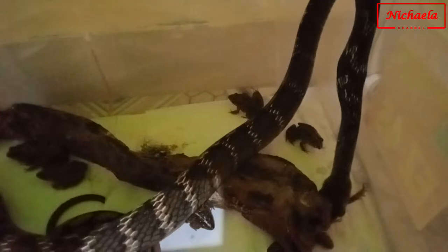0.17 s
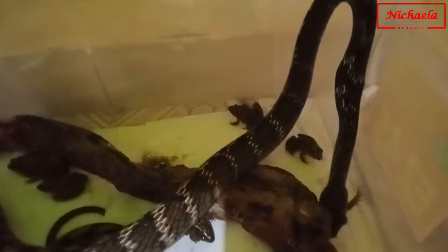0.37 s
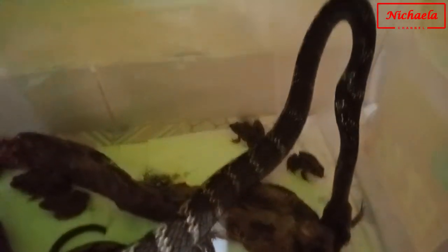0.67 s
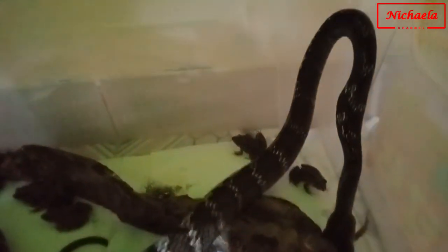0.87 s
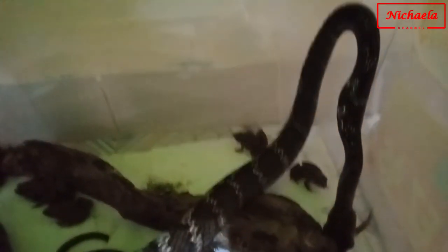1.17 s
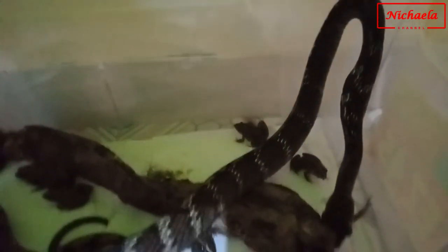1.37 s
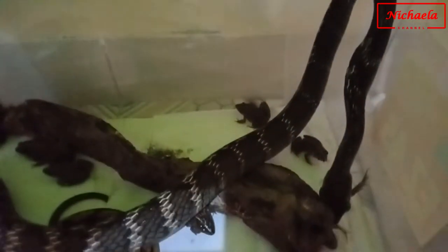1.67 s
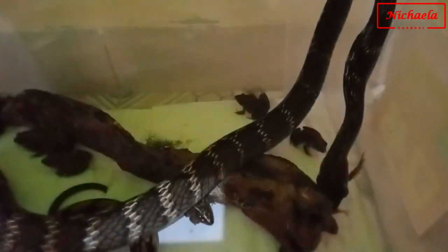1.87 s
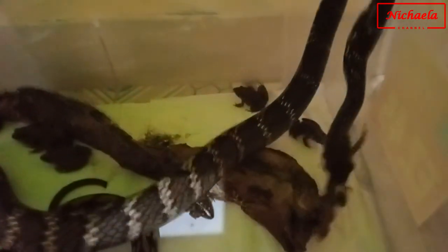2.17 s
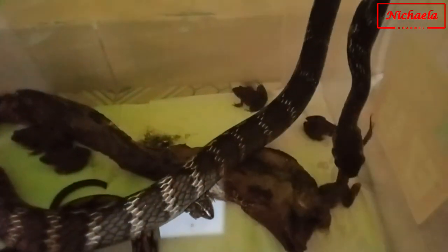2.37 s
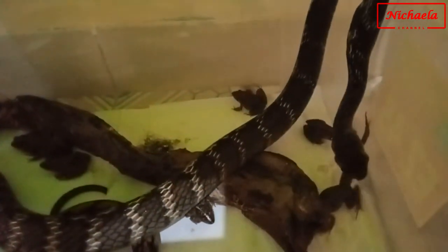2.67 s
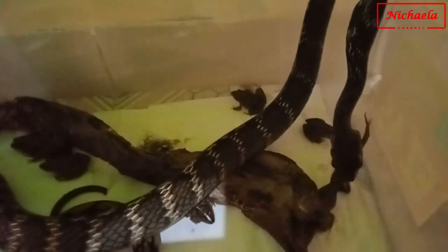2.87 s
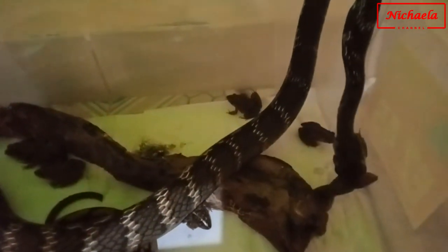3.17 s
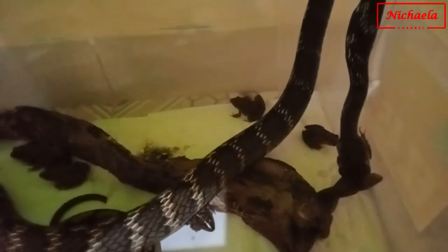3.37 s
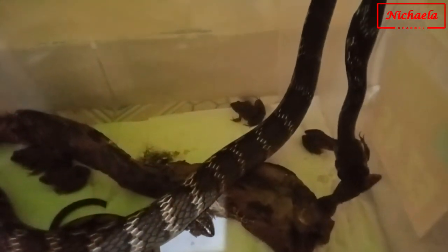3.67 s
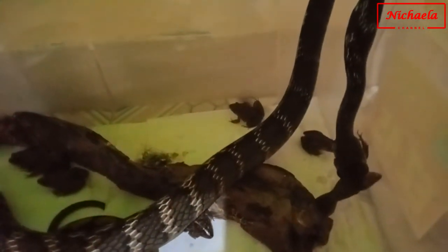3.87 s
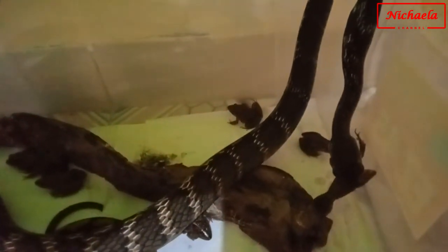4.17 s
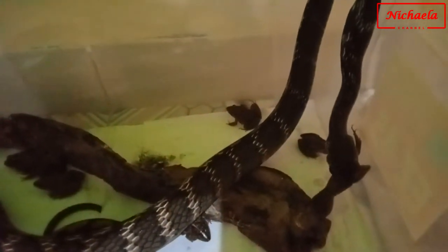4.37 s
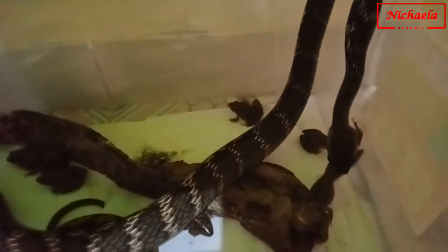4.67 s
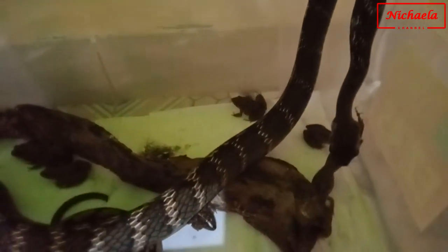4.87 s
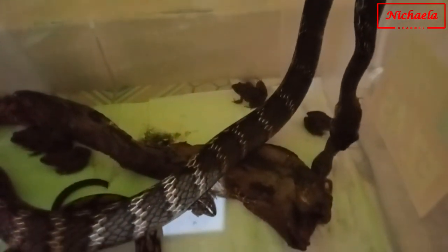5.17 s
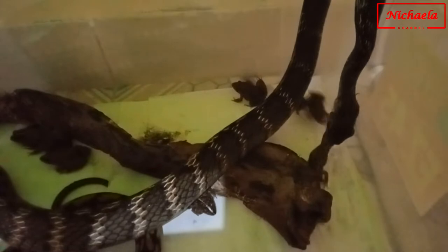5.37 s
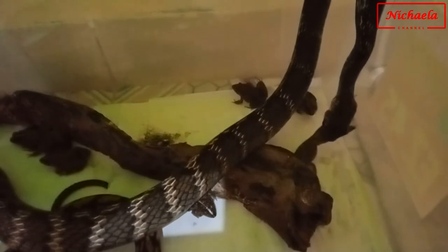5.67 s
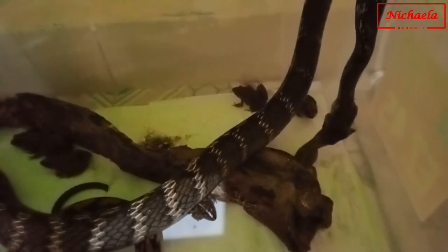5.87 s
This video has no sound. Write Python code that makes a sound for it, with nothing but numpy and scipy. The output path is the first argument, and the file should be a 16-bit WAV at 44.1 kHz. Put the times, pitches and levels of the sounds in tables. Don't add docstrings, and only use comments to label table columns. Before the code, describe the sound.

A frog gives five short, harsh, high screams inside a hard-walled box, with thin squeals, a croak, body knocks and skin rustling between them.

```python
import sys
import numpy as np
from scipy import signal
from scipy.fft import rfft, irfft, next_fast_len
from scipy.io import wavfile
from scipy.ndimage import uniform_filter1d

SR = 44100
rng = np.random.default_rng(int(sys.argv[2]) if len(sys.argv) > 2 else 0)


def output_pcm(signal):
    pcm = np.clip(np.atleast_2d(signal).T, -1, 1) * 32767
    wavfile.write(sys.argv[1], SR, np.round(pcm).astype(np.int16))


def boost(x):
    u = np.asarray(x, float) / 20
    return 10 ** u


N = 264952
MOVED_S = 2.0


def unit(x):
    return x / np.sqrt(np.sum(x ** 2) + 1e-20)


def gated(rows, level_db, fade_s=0.0028):
    s, out = np.array(rows)[:, 0], np.zeros(N)
    at = np.arange(round((s[0] - fade_s) * SR), min(round(s[-1] * SR), N))
    fade_in = (at / SR - s[0]) / fade_s + 1
    fade_out = (s[-1] - at / SR) / fade_s
    edge = np.clip(np.minimum(fade_in, fade_out), 0, 1)
    out[at] = edge * boost(np.interp(at / SR, s, level_db))
    return out


def level(rows):
    return gated(rows, np.array(rows)[:, -1])


def coloured(x, spectrum):
    size, points = next_fast_len(len(x)), np.array(spectrum)
    hz = np.maximum(np.fft.rfftfreq(size, 1 / SR), 1)
    gain_db = np.interp(np.log(hz), np.log(points[:, 0]), points[:, 1], left=-90, right=-90)
    gain = boost(gain_db)
    return irfft(rfft(x, size) * gain / np.sqrt(np.mean(gain ** 2)), size)[:len(x)]


def drift(rate_hz):
    lowpass = signal.butter(2, rate_hz, fs=SR, output="sos")
    slow = signal.sosfilt(lowpass, rng.standard_normal(N + SR))[SR:]
    return slow / slow.std()


def band(x, low_hz, high_hz, order=2):
    return signal.sosfilt(signal.butter(order, [low_hz, high_hz], "band", fs=SR, output="sos"), x)


def ring(x, hz, width_hz):
    r, state, out = np.exp(-np.pi * width_hz / SR), np.zeros(2), []
    zeros = [(1 - r * r) / 2, 0, (r * r - 1) / 2]
    for part, now_hz in zip(np.array_split(x, len(hz)), hz):
        poles = [1, -2 * r * np.cos(2 * np.pi * now_hz / SR), r * r]
        rung, state = signal.lfilter(zeros, poles, part, zi=state)
        out.append(rung)
    return np.concatenate(out)


def resonate(x, modes, stretch):
    return sum((-1) ** k * boost(db) * ring(x, hz * stretch, width_hz)
               for k, (hz, width_hz, db) in enumerate(modes))


# (middle [s], length [s], peak [dB])
SWELLS = [(0.405, 0.72, -48), (1.15, 0.41, -56), (1.439, 0.23, -59.5), (1.783, .55, -57.5),
          (2.189, 0.13404, -36), (2.371, 0.44, -47), (3.024, 0.14, -58.5), (3.25, 0.14, -63),
          (3.46, 0.1566, -63), (4.411, 0.32, -65.5), (4.754, 0.37, -67.5), (5.561, 0.27, -76)]
# (frequency [Hz], density [dB per Hz])
RUMBLE_SPECTRUM = [(20, -20.5), (37, -16.5), (56, -7), (97, 3), (151, -2.5), (262, -25), (422, -21.5),
                   (700, -35)]
HISS_SPECTRUM = [(300, -32.5), (500, -8), (1100, -12.5), (2400, -10), (3500, -10), (6000, -17.5),
                 (10000, -26.5), (16000, -35.5)]
HISS_DB, RUMBLE_BED_DB = -71.5, -74.5
SCREAM_RUMBLE_DB = -48.5


def background():
    (effort, opening), t = effort_and_jaw(), np.arange(N) / SR
    gain = boost(RUMBLE_BED_DB) + effort * boost(SCREAM_RUMBLE_DB + jaw(opening, column=3))
    for s, length_s, db in SWELLS:
        gain = gain + boost(db) * np.cos(np.pi * np.clip((t - s) / length_s, -.5, .5)) ** 2
    rumble = coloured(rng.standard_normal(N), RUMBLE_SPECTRUM) * gain * boost(2.1 * drift(7.6))
    hiss = boost(HISS_DB + 2.5 * drift(6)) * coloured(rng.standard_normal(N), HISS_SPECTRUM)
    return rumble + hiss


# (start [s], length [s], level [dB])
DRAGS = [
    (0.194, 0.34, -55),
    (2.11, .49, -60),
    (4.797, .25, -58.5),
]
# (time [s], peak [dB], t60 [s])
SLIPS = [
    (.22, -53, 0.043),
    (0.409, -39.5, 0.059),
    (2.11, -47, .5),
    (2.153, -27, 0.034),
    (2.328, -54, 0.78),
    (2.501, -50, 0.34),
    (4.862, -42, 0.04604),
    (5.088, -49, .4),
]
# (frequency [Hz], density [dB per Hz])
RUSTLE_SPECTRUM = [(200, -42), (420, -16), (800, -24), (1400, -2.5), (3300, -9), (5500, -26.5),
                   (9000, -42.5), (15000, -53.5)]
SLIP_RISE_S = .006


def rustle():
    slips = (rng.random(N) < 4000 / SR) * rng.standard_normal(N) * boost(3 * drift(35))
    heard = box(coloured(slips, RUSTLE_SPECTRUM), modes_db=-2.0)
    gain = sum(gated([(s, db), (s + length_s, db)], [db, db], fade_s=0.025) for s, length_s, db in DRAGS)
    for s, db, t60_s in SLIPS:
        gain = gain + level([(s - SLIP_RISE_S, db - 18.5), (s, db), (s + t60_s / 2, db - 27.5)])
    return heard / heard.std() * gain


# (time [s], peak [dB], thud around 190-1100 Hz re peak [dB], hiss above 3.6 kHz re
# peak [dB])
KNOCKS = [(0.408, -37.5, -39.5, -36.5), (1.166, -43.5, -7, -31), (1.194, -32.5, -36, -18.5),
          (1.644, -41, -34, -10), (2.108, -34, -29, -32.5), (2.135, -10.5, -23.5, -31),
          (2.155, -5.5, -9.5, -47.5), (2.214, -32, -2.5, -35), (2.331, -19.5, -10.5, -32),
          (2.363, -14, -21.5, -26), (2.413, -29.5, -14, -31), (2.499, -29, -16.5, -6.5),
          (2.956, -23.5, -21.5, -28), (3.078, -37, -43, -9), (4.4, -30.5, -35.5, -38.5),
          (5.076, -52.5, -45, -2), (5.528, -35.5, -42, -7)]
# (frequency [Hz], density [dB per Hz])
SLAP_SPECTRUM = [(300, -27.5), (600, -12), (1000, -13.5), (1800, -1), (2700, -7), (3900, -13), (5500, -31),
                 (7000, -44)]
KNOCK_T60_S, KNOCK_RISE_S = .06, 0.00017


def knocks():
    slap = coloured(rng.standard_normal(N), SLAP_SPECTRUM)
    thud = band(rng.standard_normal(N), 190, 1100) * boost(23.5)
    hiss = band(rng.standard_normal(N), 3600, 6600) * boost(9.5)
    hiss = hiss + band(rng.standard_normal(N), 9500, 15500) * boost(-11.5)
    out = np.zeros(N)
    for s, db, thud_db, hiss_db in KNOCKS:
        span = slice(round(s * SR), round(s * SR) + SR // 3)
        age_s = np.arange(len(out[span])) / SR
        dying = (slap[span] + hiss[span] * boost(hiss_db)) * boost(-60 * age_s / KNOCK_T60_S)
        booming = thud[span] * boost(thud_db - 60 * age_s / (2.3 * KNOCK_T60_S))
        out[span] += boost(db - 11.5) * (1 - np.exp(-age_s / KNOCK_RISE_S)) * (dying + booming)
    return out


# (start [s], held [s], effort [dB], mouth opening [0-1], swell of effort while held [dB])
CALLS = [
    (.541, 0.015, -22, 0.2, 14.5),
    (.582, .053, -10, 0.3, 5.5),
    (.65, 0.28, -5, 1.04, -5),
    (2.678, 0.23, -6, .86, -0.2),
    (3.58, 0.074, -6.5, 0.5, -1.5),
    (3.889, .024, -10, .12, -5),
    (4.003, 0.14, -1.5, .62, -4),
    (5.213, .158, -4, .92, -2.3),
]
JAW_SAG_PER_S = 1.02
RELEASE_S, CLOSING_S = .009, 0.013


def call_times():
    s, held_s, _, wide, _ = np.transpose(CALLS)
    tired = np.maximum(wide - JAW_SAG_PER_S * held_s, 0)
    return np.transpose([s, s + held_s, s + held_s + RELEASE_S + CLOSING_S * tired, tired])


# (time [s], effort [dB], mouth opening [0-1])
SNAPS = [
    (1.1192, -29.5, 0.01),
    (1.1522, -32.5, 0.01),
    (3.3815, -28.5, 0.01),
    (3.8422, -25.5, 0.01),
    (3.922, -6.5, 0.4),
    (3.9714, -4, .45),
    (3.9892, -5.5, .5),
    (4.8643, -26.5, 0.01),
    (4.9222, -33, .35),
]
ATTACK_S, ATTACK_DB, RELEASE_DB = .003, -1.5, -19.5
CLOSING_SHARE = 0.16


def effort_and_jaw():
    effort = 0
    marks = [(s + after_s, wide) for s, _, wide in SNAPS for after_s in (0, .008)]
    for (s, hold_end, end, tired), (_, _, db, wide, swell_db) in zip(call_times(), CALLS):
        held_db = db + swell_db
        effort = effort + level([(s, db + ATTACK_DB), (s + ATTACK_S, db),
                                 (hold_end, held_db), (end, held_db + RELEASE_DB)])
        closing = hold_end - CLOSING_SHARE * (hold_end - s)
        marks += [(s, wide), (closing, tired), (hold_end + RELEASE_S / 2, 0), (end, 0)]
    return effort, np.interp(np.arange(N) / SR, *np.transpose(sorted(marks)))


# (opening [0-1], throat [dB], mouth [dB], lips [dB], stretch of head resonances [ratio])
JAW = [
    (0, -3, -10, -29.5, .9),
    (.5, -9, 0.01, -14, 0.98),
    (.75, -8, -3.5, -9.5, 1.03),
    (1, -9, 2, -4.5, 1.19),
]


def jaw(opening, column):
    return np.interp(opening, np.array(JAW)[:, 0], np.array(JAW)[:, column])


# (time [s], snap rate [Hz], irregularity [0-1])
CORDS = [(.54, 191, 0.1), (.577, 218.2, .3), (.61, 313.7, .12), (.652, 349.3, .19), (.72, 357.6, .14),
         (.741, 391.6, .1), (.83, 340.7, .15), (0.94, 253.6, .16), (2.682, 340, .18), (2.846, 341, .22),
         (2.852, 675.5, .05), (2.882, 675.9, .08), (2.935, 704.4, .2), (3.58, 350, .18), (3.61, 400, .11),
         (3.69, 378, 0.4), (3.889, 196, .2), (3.92, 179, .1), (4.002, 109.6, 0.03), (4.03, 111.3, .05),
         (4.065, 139.2, .06), (4.091, 143.3, 0.02), (4.14, 328.8, .17), (4.18, 373.5, .06),
         (5.212, 340.2, .15), (5.249, 300, .25), (5.338, 399.3, .25), (5.344, 719, .09), (5.4, 762.2, .18)]
PUSH_DB_PER_OCTAVE, USUAL_RATE_HZ = 3.5, 315.5


def cords():
    s, *columns = np.transpose(CORDS)
    rate_hz, rough = (np.interp(np.arange(N) / SR, s, column) for column in columns)
    step = rate_hz * np.exp(2.6 * rough ** 2 * drift(300)) / SR
    push_db = PUSH_DB_PER_OCTAVE * np.log2(rate_hz / USUAL_RATE_HZ)
    strength = boost(11.5 * rough * rng.standard_normal(N) + push_db) * np.sqrt(SR / rate_hz)
    snaps = 0.35 * rough * rng.standard_normal(N)
    for s, _, end, _ in call_times():
        start = round(s * SR)
        cycles = np.cumsum(step[start:round(end * SR)])
        at = np.flatnonzero(np.diff(np.floor(cycles), prepend=-1))
        early = cycles[at] % 1 / step[start + at]
        snaps[start + at] += strength[start + at] * early
        snaps[start + at + 1] += strength[start + at] * (1 - early)
    return snaps


# (frequency [Hz], width [Hz], level [dB])
THROAT = [(485, 300, -30), (782, 150, -17.5), (1441, 384, 2.5), (1965, 630, 4.5)]
MOUTH = [(2546, 140, -0.82), (3140, 240, 0.87), (3942, 450, -2)]
LIPS = [(4517, 96, 7.5), (5020, 620, -13), (5560, 200, -19), (6900, 760, -29)]


def frog():
    (effort, opening), voice = effort_and_jaw(), 0
    snaps = cords() * effort
    tiny_noise = 1e-9 * rng.standard_normal(N)
    stretch = jaw(opening, column=4)[::400]
    for s, db, _ in SNAPS:
        snaps[round(s * SR)] += boost(db + 21.5)
    parts = ((THROAT, 11.0, .5), (MOUTH, 11.0, 1), (LIPS, 13.0, .5))
    for column, (modes, makeup_db, follow) in enumerate(parts, 1):
        drive = snaps * boost(jaw(opening, column))
        edge = band(drive + tiny_noise, modes[0][0] * 0.87, modes[-1][0] * 1.23)
        voice = voice + boost(makeup_db) * resonate(edge, modes, stretch ** follow)
    return voice


CORNER_CUT_HZ, CORNER_LEAK_DB = 1180, -20


def cornered(x):
    highpass = signal.butter(6, CORNER_CUT_HZ, "high", fs=SR, output="sos")
    thin = signal.sosfilt(highpass, x) + boost(CORNER_LEAK_DB) * x
    return np.where(np.arange(N) < MOVED_S * SR, x, thin)


def whistle(rows, second_db, third_db, waver):
    gain = level(rows) * boost(2.3 * drift(65))
    at = np.flatnonzero(gain)
    hz = np.interp(at / SR, *np.transpose(rows)[:2]) * (1 + waver * drift(50)[at])
    hz = uniform_filter1d(hz, size=400, mode="nearest")
    phase = 2 * np.pi * np.cumsum(hz) / SR
    partials = np.sin(phase) + boost(second_db) * np.sin(2 * phase) + boost(third_db) * np.sin(3 * phase)
    gain[at] *= np.sqrt(2) * partials
    return gain


# (time [s], pitch [Hz], level [dB])
SQUEALS = [
    [(2.5, 5254, -55), (2.512, 4854, -43), (2.54, 4288, -35), (2.57, 4148, -33.5), (2.612, 4238, -31.5),
     (2.66, 4415, -32.5), (2.678, 4750, -25.5)],
    [(5.078, 5910, -61.5), (5.09, 5317, -32.5), (5.104, 5214, -29.5), (5.136, 4576, -21.5),
     (5.158, 4500, -36), (5.167, 4566, -27), (5.199, 4555, -21.5), (5.211, 4776, -24), (5.225, 4850, -11.5)],
]
CHIRPS = [
    [(3.54, 1644, -46), (3.544, 1659, -43.5), (3.574, 2094, -38.5), (3.58, 2107, -24)],
    [(5.912, 2400, -68), (5.922, 2390, -53), (5.936, 2547, -54), (5.955, 2360, -73.5)],
]
PEEP = [(3.935, 7110, -57.5), (3.941, 7065, -69), (3.955, 7515, -75), (3.97, 7548, -55.5)]
LEAK_S, LEAK_DB = .03, -42


def whistles():
    thin = sum(whistle(rows, second_db=-33.0, third_db=-54.0, waver=.003) for rows in SQUEALS)
    hoarse = sum(whistle(rows, second_db=-7.0, third_db=-18, waver=0.04) for rows in CHIRPS)
    peep = whistle(PEEP, second_db=-39.5, third_db=-70, waver=0.00592)
    starts = [rows[0][0] for rows in SQUEALS]
    leaking = sum(level([(s, LEAK_DB), (s + LEAK_S, LEAK_DB - 13.5)]) for s in starts)
    air = band(drift(9000), 5400, 6800) * boost(8)
    return thin + hoarse + peep + leaking * air


# (delay [ms], signed gain [ratio])
ECHOES_FIRST = [(1.52, 0.53), (3.38, -0.29), (4.51, -0.45), (8.57, 0.16), (9.41, -0.24), (11.81, -0.3)]
ECHOES_LATER = [(1.95, -0.17), (2.59, 0.22), (2.83, -0.15), (2.86, 0.57), (3.17, 0.056), (3.45, -0.2),
                (4.76, 0.22), (7.07, 0.38), (8.1, 0.09), (9.18, 0.36), (9.93, -0.04), (10.75, -0.23)]
# (frequency [Hz], width [Hz], level [dB])
BOX_MODES = [(1428.3, 52, 1), (1617, 15, -4), (1670, 16, -4.5), (2129.7, 17, 4), (3100, 190, -2)]
BOX_T60_S = 0.081


def box(x, modes_db):
    out, first, age_s = 0, np.arange(N) < MOVED_S * SR, np.arange(SR // 10) / SR
    for part, echoes in ((x * first, ECHOES_FIRST), (x * ~first, ECHOES_LATER)):
        scatter = rng.standard_normal(len(age_s)) * boost(-60 * age_s / BOX_T60_S) * (age_s > .003)
        taps = boost(-1.5) * unit(scatter)
        taps[0] = 1
        for ms, gain in echoes:
            taps[round(ms * SR / 1000)] += gain
        out = out + signal.fftconvolve(part, unit(taps))[:N]
    return out + boost(modes_db) * resonate(x, BOX_MODES, np.ones(1))


# (frequency [Hz], t60 [s])
ROOM_DECAY = [(300, .3), (1300, 0.67), (3500, 0.45), (8000, .3)]


def room(x):
    t, points = np.arange(SR) / SR, np.array(ROOM_DECAY)
    edges_hz = 200 * 2 ** np.arange(0, 6.1, .5)
    t60_s = np.interp(np.log(edges_hz), np.log(points[:, 0]), points[:, 1])
    tail = sum(band(rng.standard_normal(SR), low, high) * boost(-60 * t / decay_s)
               for low, high, decay_s in zip(edges_hz, edges_hz[1:], t60_s))
    return signal.fftconvolve(x, boost(10) * tail * (1 - np.exp(-t / .006)) / np.sqrt(SR))[:N]


def scene():
    near = box(cornered(frog()) + whistles(), modes_db=0.5) + knocks()
    return (near + boost(-15) * room(near) + rustle() + background())[None]


def band_limit(x):
    return signal.sosfilt(signal.butter(12, 15800, fs=SR, output="sos"), x)


def record(dry):
    start_s = 0.12
    on = np.arange(N) > start_s * SR
    return band_limit(np.clip(dry * on, -.99, .99))


dry = scene()
out = record(dry)
output_pcm(out)
```